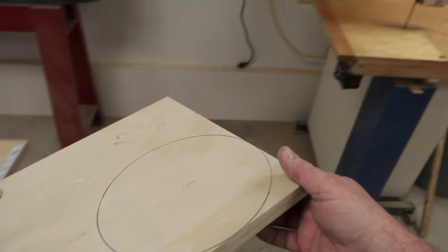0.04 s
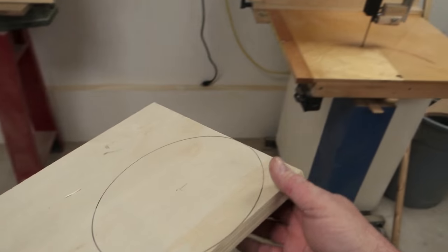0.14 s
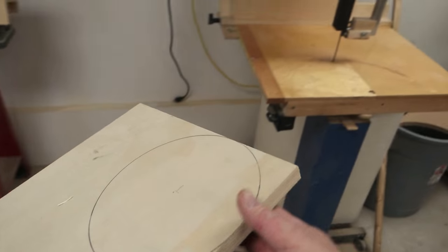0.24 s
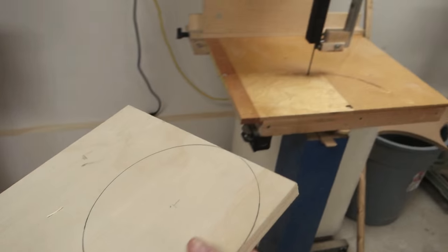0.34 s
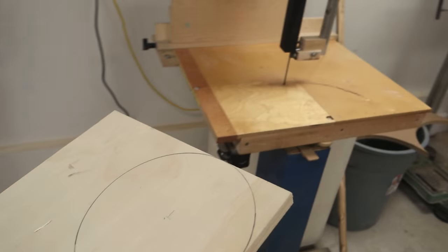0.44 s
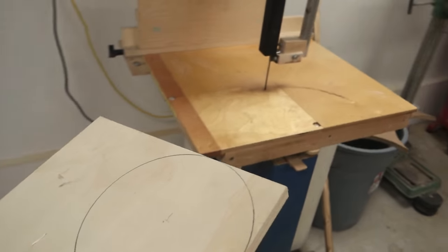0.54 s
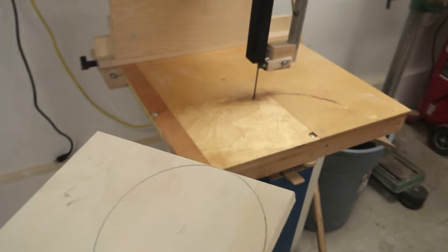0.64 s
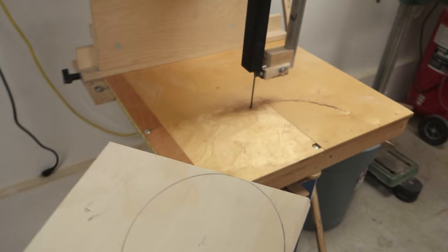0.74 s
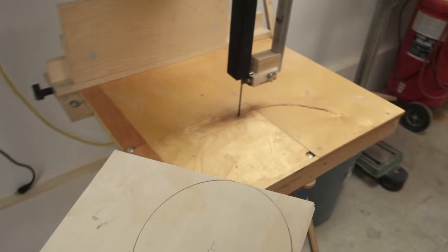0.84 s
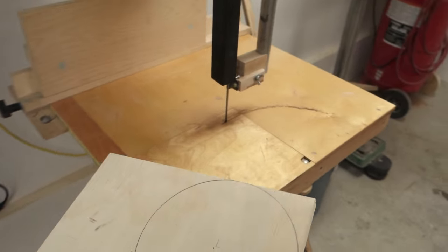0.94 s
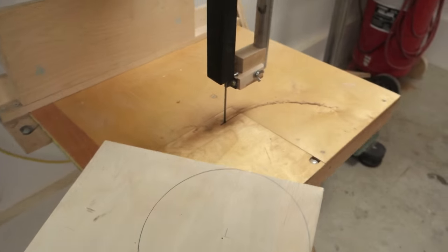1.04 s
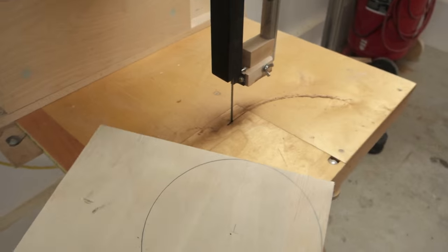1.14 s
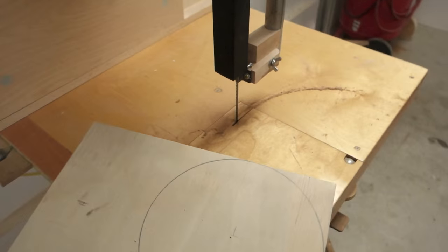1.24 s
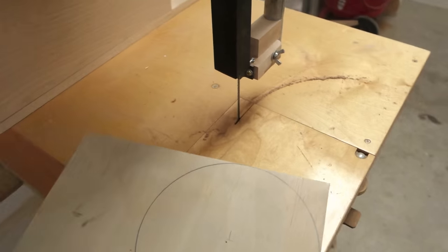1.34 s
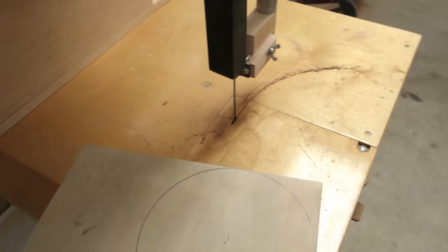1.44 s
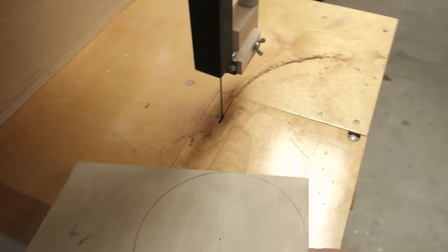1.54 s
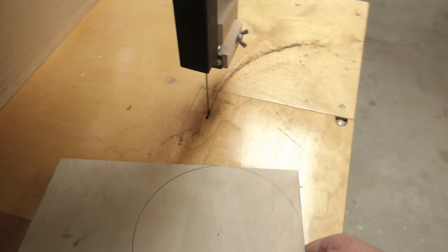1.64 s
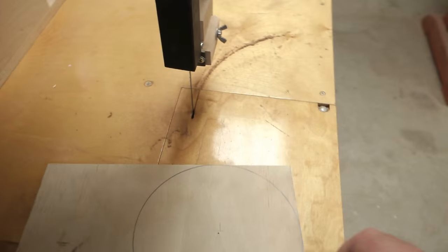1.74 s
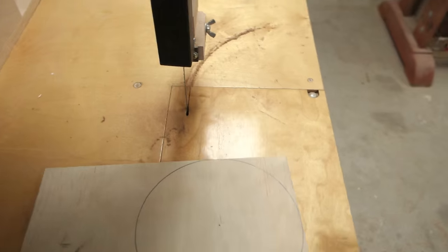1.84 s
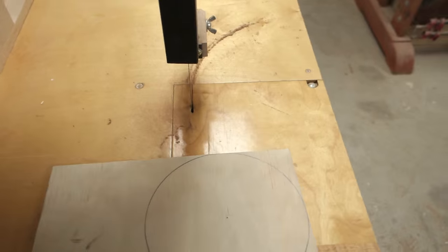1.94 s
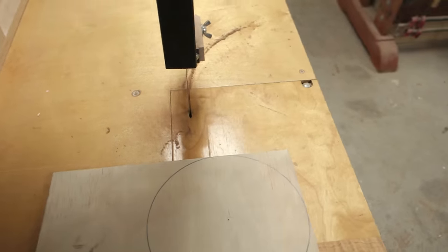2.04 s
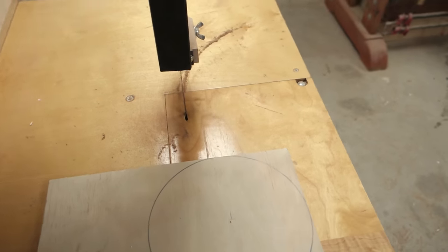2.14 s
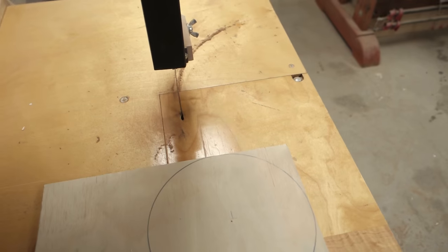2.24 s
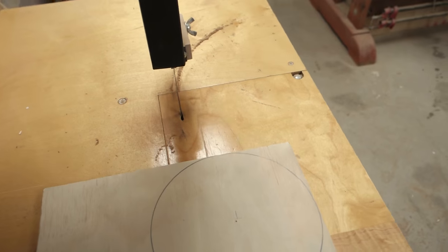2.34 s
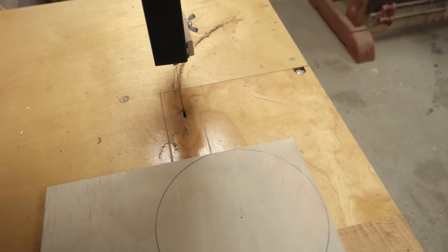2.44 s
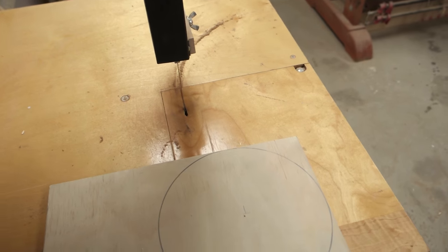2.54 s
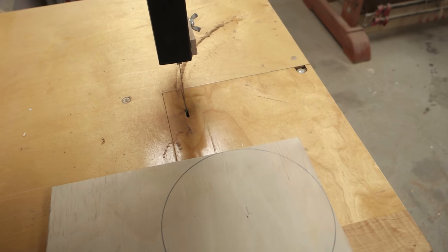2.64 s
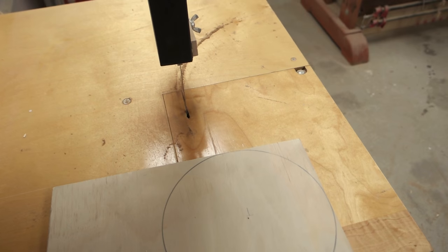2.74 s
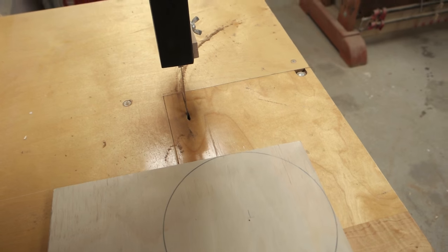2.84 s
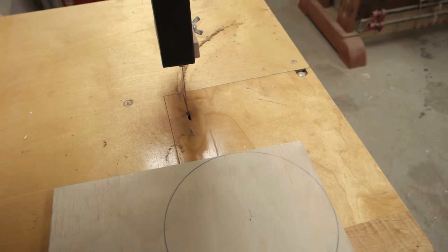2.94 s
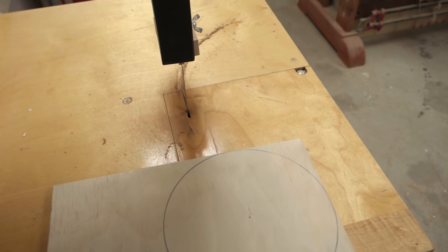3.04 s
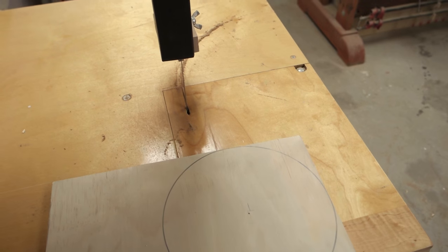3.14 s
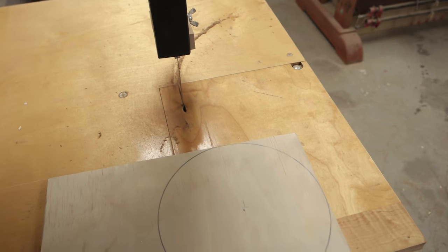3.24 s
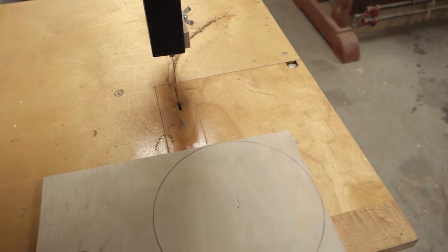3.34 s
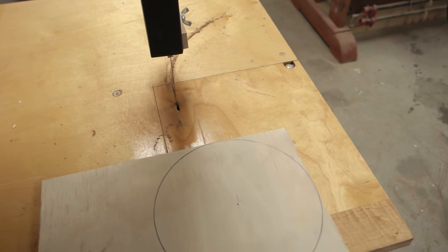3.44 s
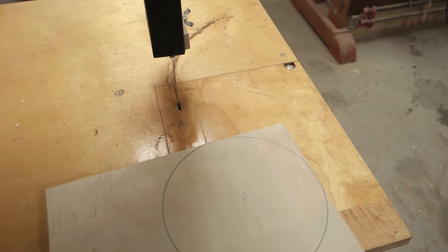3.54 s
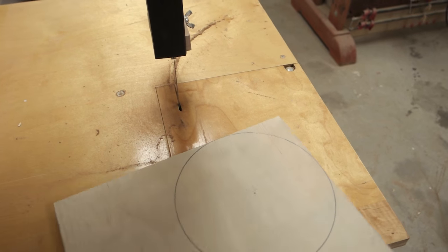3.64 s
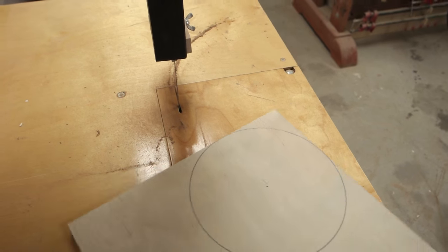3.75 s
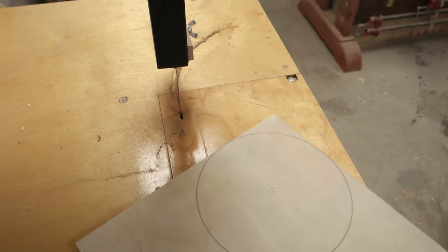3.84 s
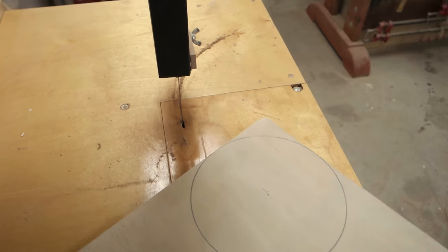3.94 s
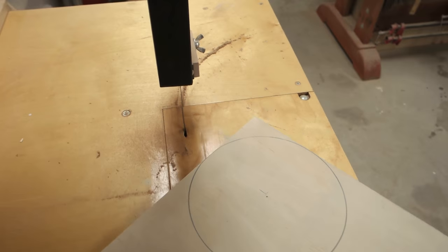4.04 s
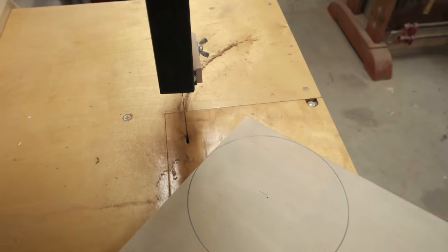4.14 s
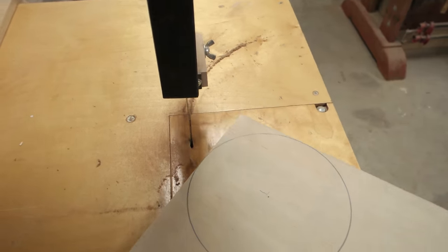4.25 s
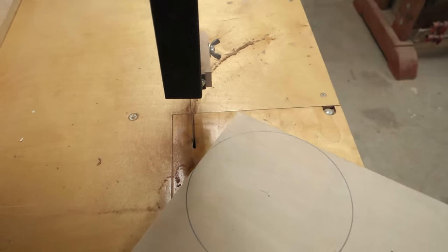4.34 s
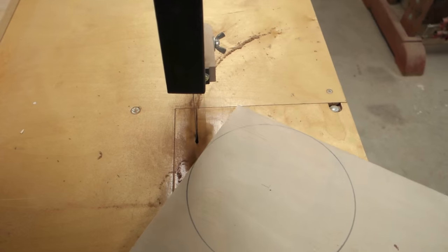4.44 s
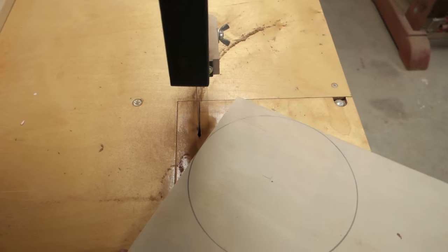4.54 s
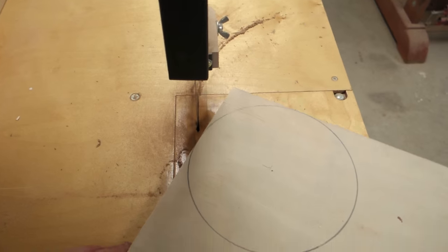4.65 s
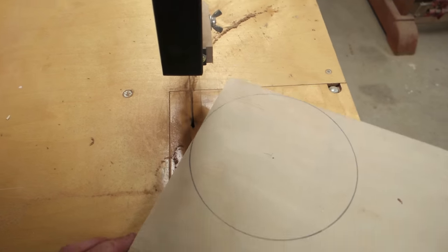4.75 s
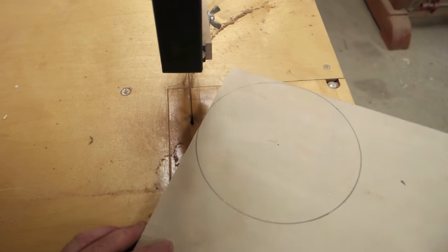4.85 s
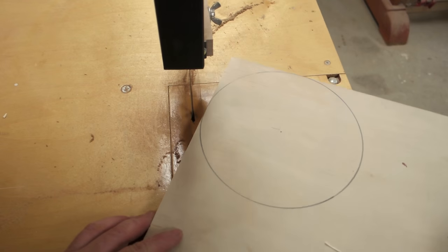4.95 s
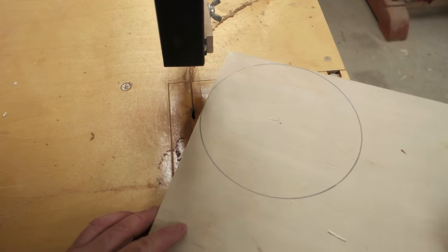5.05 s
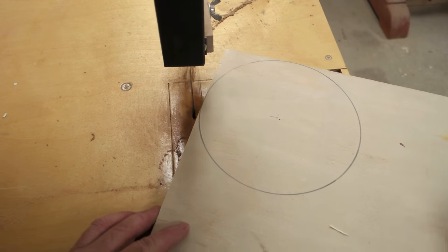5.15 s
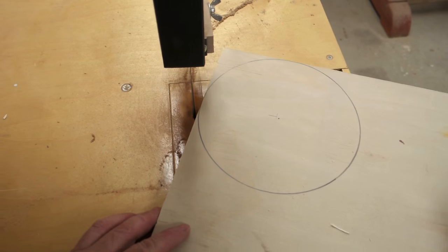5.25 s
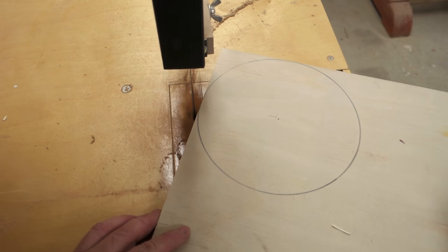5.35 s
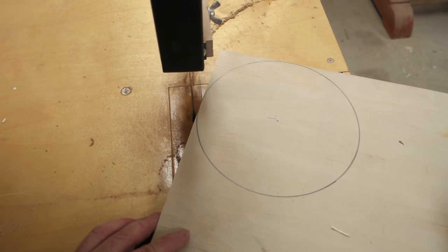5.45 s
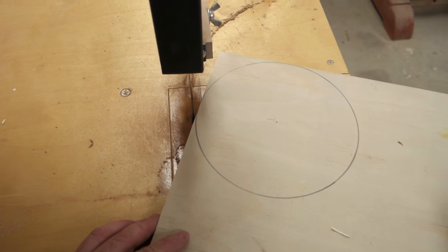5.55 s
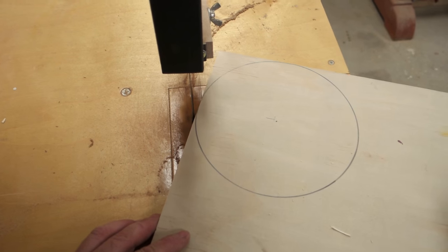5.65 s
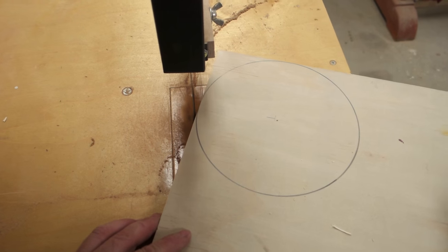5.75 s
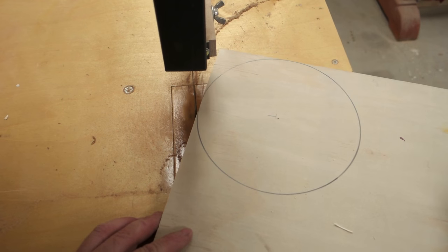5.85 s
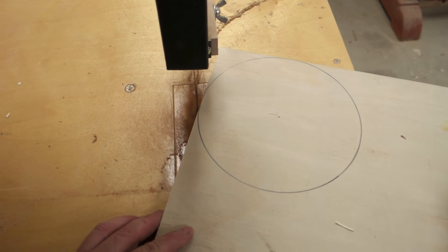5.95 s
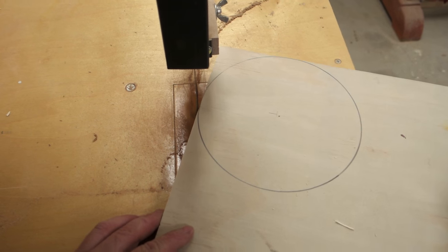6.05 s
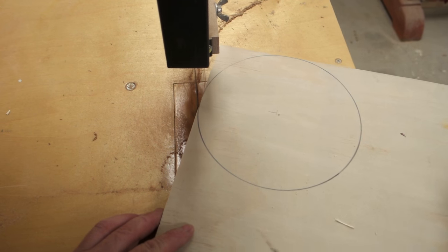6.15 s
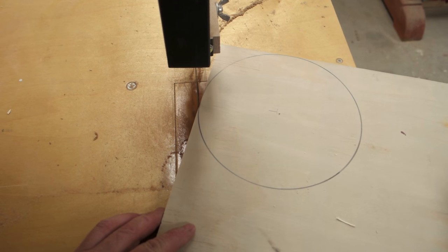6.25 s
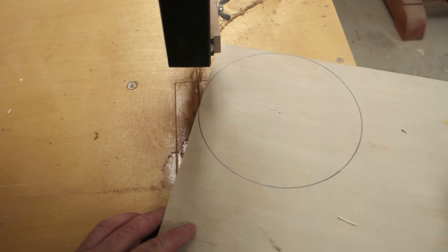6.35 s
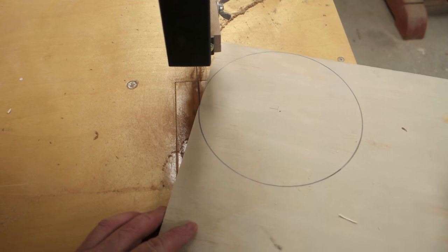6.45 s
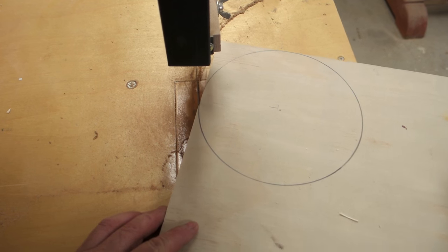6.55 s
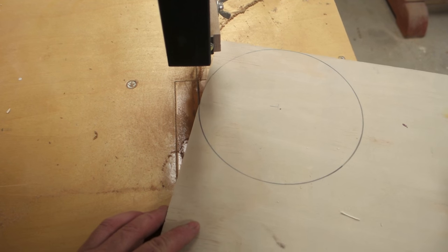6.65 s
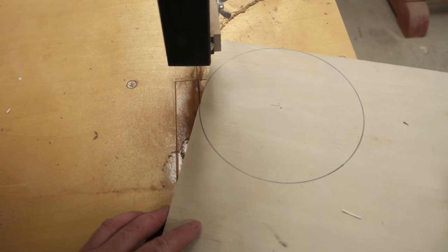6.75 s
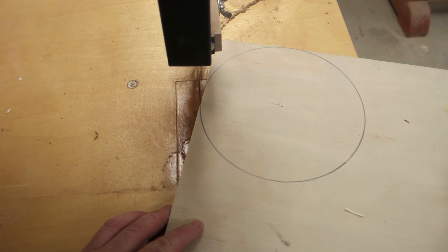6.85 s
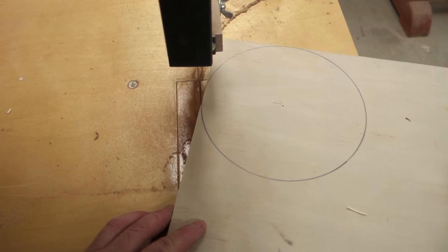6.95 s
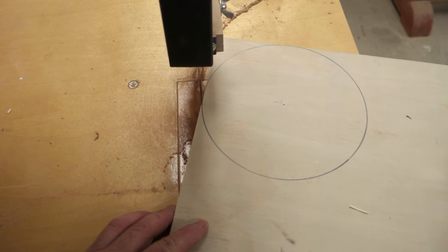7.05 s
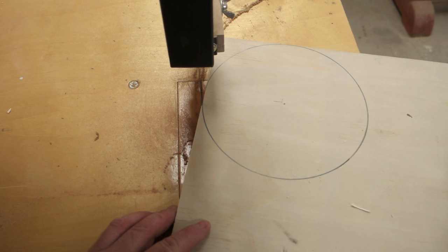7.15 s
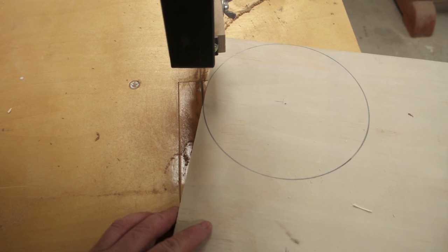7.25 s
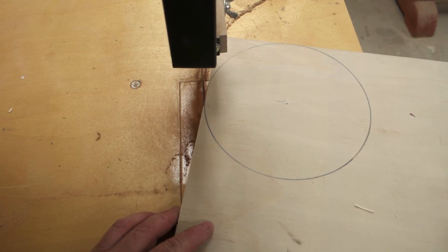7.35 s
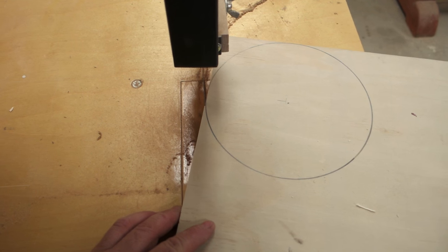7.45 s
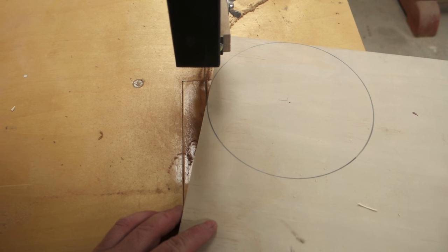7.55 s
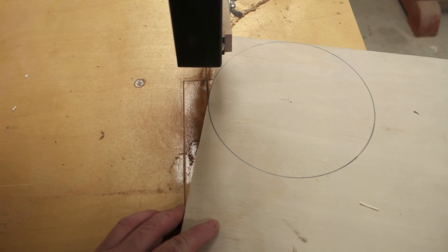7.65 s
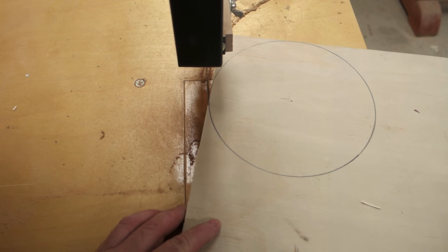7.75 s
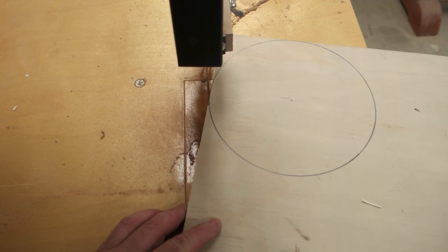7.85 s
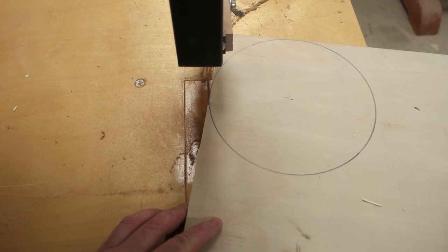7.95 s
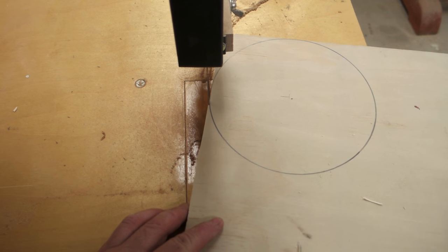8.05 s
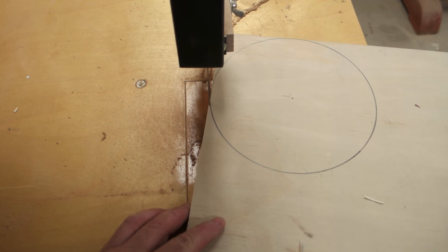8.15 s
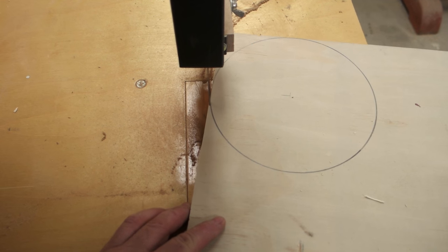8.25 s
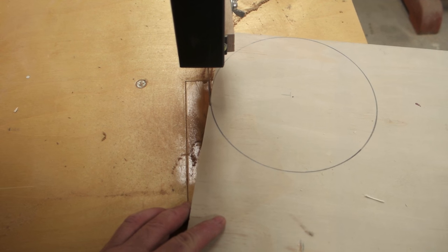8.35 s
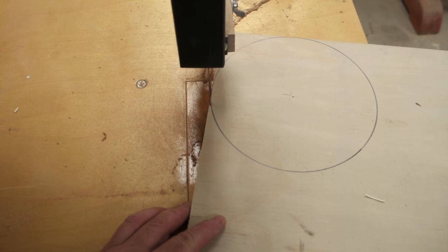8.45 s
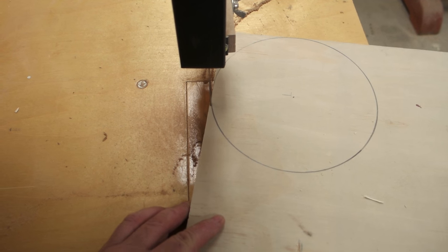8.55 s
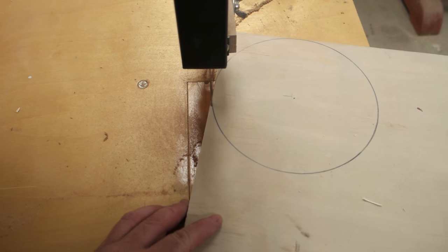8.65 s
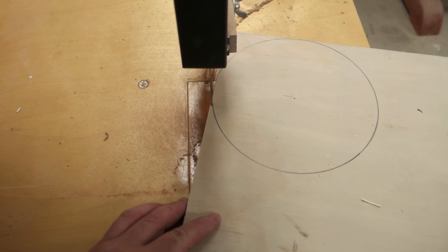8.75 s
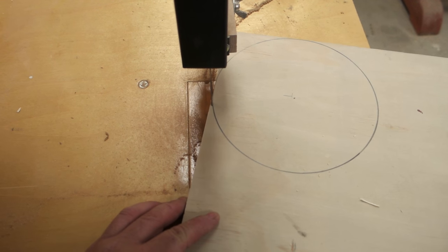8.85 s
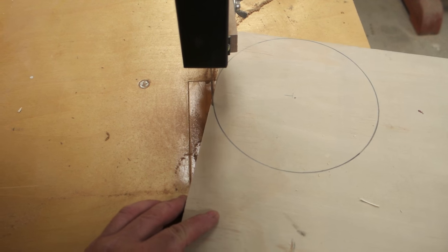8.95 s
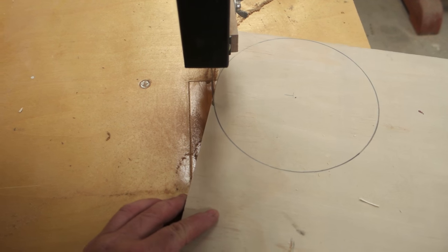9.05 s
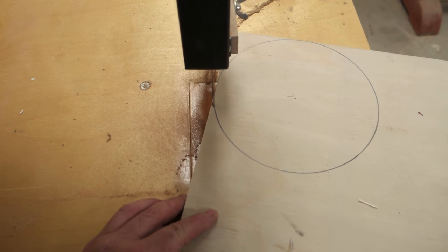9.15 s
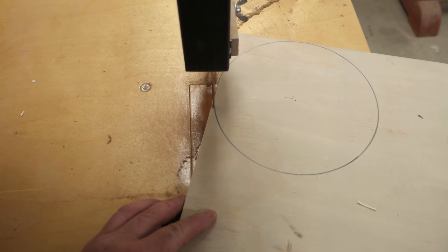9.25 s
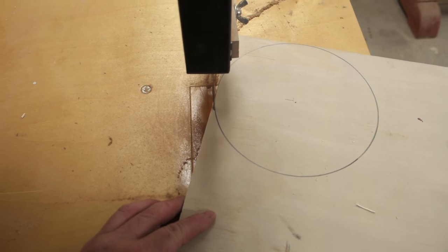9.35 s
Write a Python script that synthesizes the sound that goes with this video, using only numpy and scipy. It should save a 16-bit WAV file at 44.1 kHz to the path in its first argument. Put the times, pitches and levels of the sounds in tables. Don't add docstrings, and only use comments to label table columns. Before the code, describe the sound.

Close, centred camera sound in a small hard workshop. From 0 to 1.5 seconds, quiet cloth rustle, finger rubs and little board scuffs over faint hiss. A stronger wooden rub leads to a dull touch at 1.6, a bright bouncing knock around 1.77 and another double knock at 1.92, with low thumps and short room ring. A slide and bump follow near 2.3, then faint handling. At 3.2 a switch snaps; the motor jerks, the cabinet shudders, and hum and blade hiss climb, with a soft thud around 4.1. It runs steadily, hissing in small rhythmic swells. From 6.4 teeth graze the wood with thin flickering tones. After 7.2 the whine hardens, with woody groans around 7.6 to 7.9. From 7.8 to 9.4 it is loud, shrill and gritty, chips tearing, pitch nearly steady, hiccupping about every quarter second, easing slightly at the end.

```python
import sys
import numpy as np
from scipy import signal
from scipy.fft import rfft, irfft, next_fast_len
from scipy.io import wavfile
from scipy.ndimage import uniform_filter1d, map_coordinates

SR = 44100
rng = np.random.default_rng(int(sys.argv[2]) if len(sys.argv) > 2 else 0)


def bounce(signal):
    frames = np.transpose(np.atleast_2d(signal))
    limited = np.clip(frames, -1, 1)
    pcm = np.round(limited * 32767).astype(np.int16)
    wavfile.write(sys.argv[1], SR, pcm)


def boost_factor(decibels):
    exponent = np.asarray(decibels, float) / 20
    return 10 ** exponent


N = 414099
T = np.arange(N) / SR
SWITCH_S = 3.217
IDLE_FEED_DB = -46.5

# frequency in Hz, density in dB per Hz.
CLOTH_SPECTRUM = [(290, -30), (500, -1), (759, -9), (929, -6), (1200, -4.5), (3160, -4.5), (5950, -5.5),
                  (14500, -30), (15600, -41)]
# frequency in Hz, density in dB per Hz.
STAND_SPECTRUM = [(12, -46), (20, -3), (45, 1), (80, -0.5), (150, -8), (202, -7), (238, -7.5), (341, -8),
                  (481, -16.5), (630, -11), (1500, -23.5), (1950, -59), (3300, -120)]
# frequency in Hz, density in dB per Hz.
MIC_HISS_SPECTRUM = [(880, -31), (1500, -11), (1670, -2), (4370, -26), (5860, -8), (15000, -5),
                     (15600, -13)]
# frequency in Hz, width in Hz, level in dB.
HELD_BOARD_MODES = [(625, 70, 0), (870, 80, -4), (1380, 150, -3), (2280, 220, -3.5), (3400, 400, -10)]
# peak in seconds, level in dB, 20 dB rise in seconds, 20 dB fall in seconds.
STROKES = [(.07, -76, 0.59, 0.44), (.43, -69.5, 0.44, 0.1), (.63, -69.5, 0.16, 0.26),
           (.76, -72, 0.16, 0.028), (1.084, -62, 0.015, 0.12), (1.17, -69, 0.055, 0.31),
           (1.372, -86, .03, .03), (1.55, -72, 0.17, .3), (1.7, -66, 0.077, 0.14),
           (1.81, -74, 0.064, 0.069), (1.92, -58, 0.013, 0.091), (2.0, -63, 0.13, 0.18),
           (2.06, -56, 0.15, 0.13), (2.13, -61, 0.2, 0.31), (2.19, -58, 0.17, 0.047),
           (2.316, -68, 0.031, 0.033), (2.51, -77, 0.027, 0.028), (2.64, -71, 0.14, 0.052),
           (2.81, -75.5, 0.049, 0.16), (2.895, -81, .03, 0.054), (3.08, -76.5, 0.12, 0.23)]
# peak in seconds, level in dB, rise in seconds, fall in seconds.
RUBS = [
    (.16, -68, 0.4, .12),
    (.43, -72, .15, .08),
    (.6, -64, 0.13, 0.3),
    (1.47, -61, 0.059, .1),
    (1.54, -50.5, 0.074, 0.15),
    (1.81, -53, .08, 0.27),
    (1.95, -59, .08, .28),
    (2.64, -77, 0.22, .07),
    (2.82, -71, 0.034, 0.28),
    (3.18, -67, 0.41, 0.19),
]
# peak in seconds, level in dB, rise in seconds, fall in seconds.
JOLTS = [
    (.165, -65, .06, 0.065),
    (.72, -71, 0.24, 0.18),
    (1.2, -77, 0.21, 0.37),
    (1.55, -90, 0.21, .3),
    (1.81, -50, 0.059, .12),
    (1.97, -52, 0.089, 0.21),
    (2.26, -65, .06, 0.089),
    (2.34, -63.5, 0.078, 0.053),
    (2.6, -69.5, 0.15, 0.44),
    (3.2, -64, 0.18, 0.16),
]
# start in seconds, level in dB, pitch in Hz, width in Hz, length in seconds.
SCUFFS = [(0.175, -74, 250, 300, 0.029), (.25, -73, 5700, 400, 0.15), (.27, -76, 4630, 300, .08),
          (0.334, -88, 1500, 200, .06), (.3, -75, 9900, 4000, 0.16), (0.543, -63, 500, 300, 0.012),
          (0.562, -63, 550, 300, 0.012), (0.61, -65, 500, 300, 0.015), (0.4, -70, 1490, 60, 0.05),
          (0.501, -65, 500, 500, 0.019), (1.073, -63, 810, 500, 0.15), (1.155, -54, 1330, 300, 0.03),
          (1.155, -59.5, 2280, 500, 0.041), (1.178, -60, 1700, 1500, 0.028), (1.371, -64, 250, 400, 0.011),
          (1.696, -63, 2480, 150, .02), (1.635, -68, 2470, 120, .08), (2.242, -55, 170, 260, 0.025),
          (2.29, -61.5, 2770, 500, 0.051), (2.297, -65, 1170, 150, 0.046), (2.3, -73, 647, 150, 0.091),
          (2.275, -57, 89.5, 79.5, 0.075)]

# time in seconds, peak in dB, brightness in dB per octave, thump in dB,
# rattle t60 in seconds.
KNOCKS = [
    (1.632, -27.5, -8.5, -36, 0.1),
    (1.763, -18, -1.5, -30, 0.12),
    (1.781, -14, 0.5, -41, 0.051),
    (1.801, -22, -7, -47, 0.042),
    (1.918, -14, -3, -45.5, 0.047),
    (1.934, -18.5, -4, -39.5, 0.071),
]
# time in seconds, peak in dB.
SNAPS = [
    (1.7635, -21),
    (1.783, -19),
    (1.919, -34),
]
# frequency in Hz, width in Hz, level in dB.
BOARD_MODES = [(309, 102, -5), (512, 120, -6), (695, 69, -3), (910, 160, -4.5), (1286, 220, -2),
               (1770, 400, -4.5), (2600, 350, -6), (3760, 670, -15), (5960, 1100, -18.5)]
# frequency in Hz, t60 in seconds.
ROOM_T60 = [(100, 0.55), (300, 0.5), (700, 0.36), (2000, 0.35), (5000, 0.46), (12000, 0.13)]
# time in seconds, level in dB, pitch in Hz, t60 in seconds,
# rise in seconds.
BUMPS = [(1.631, -37.5, 281, 0.31, 0.0038), (1.763, -29.5, 280, 0.24, 0.0036), (1.918, -37, 720, .22, .002),
         (1.918, -38, 834, 0.19, .002), (1.918, -34.5, 1066, 0.18, .002), (1.934, -38, 1190, .2, .002),
         (1.934, -37.5, 968, .22, .002), (1.918, -43, 1510, .15, .002), (1.763, -37.5, 246, 0.1, .003),
         (1.764, -35, 1580, 0.15, .002), (2.245, -39, 109.8, 0.14, .015), (2.255, -43, 272, 0.095, 0.011),
         (2.3, -50, 81, .25, .012), (3.235, -30, 57.9, 1.3, 0.091), (3.235, -36, 68.4, 1.5, 0.083),
         (4.09, -35, 273, 0.39, 0.026), (4.02, -36, 556, 0.22, 0.01)]

# frequency in Hz, level in dB, t60 in seconds.
SWITCH_MODES = [(660, -6, 0.19), (1034, -1.5, 5.0), (1840, -12, 0.085), (2140, -21, 0.13),
                (2100, -22, 0.17), (2410, -27, 0.17), (3520, -7.5, 0.64), (4160, -18, 0.27)]

# time in seconds, speed in turns per second, level in dB.
SHAFT = [
    (3.24, 11, -73),
    (3.6, 30, -45),
    (3.82, 26, -38),
    (4.0, 29.6, -50),
    (4.1, 31.2, -41),
    (5.2, 30, -36.5),
    (6.2, 30.9, -45),
    (9.39, 29.2, -39.5),
]
# multiple of the shaft rate, level in dB.
SHAFT_ORDERS = [(1, -13), (3, -2.5), (5, -10.5), (10, -13)]
# starting level in dB, running level in dB, jerk in dB, dropout in dB,
# gain in dB per dB of feed, slow drift in dB.
HUM_240HZ = (-41, -42.5, -51, -28.5, 0.68, -0.2)
HUM_120HZ = (-71, -43.5, -42, -31, 0.2, 0)
SHAKE = (-56, -48, -47, -52, .1, 2.5)
BELT = (-40, -41.5, -43, -63, 0.1247, 1.15)
# frequency in Hz, width in Hz, level in dB.
CABINET_MODES = [(64, 12, 0)]
# frequency in Hz, width in Hz, level in dB.
PANEL_MODES = [(200.5, 25, -9.5), (280.3, 18.5, -1.5), (304.2, 7.5, 2.5), (368.6, 10.7, 1), (440, 20, -12),
               (479, 25, -11), (544, 12, -10), (709, 25, -12)]
# frequency in Hz, density in dB per Hz.
RUMBLE_SPECTRUM = [(12, -40), (20, -12), (109, -4), (188, -2.5), (238, -9), (341, -5.5), (536, -3.5),
                   (608, -13.5), (702, -11.5), (905, -14.5), (1450, -20.5), (2200, -28.5), (2900, -45),
                   (4000, -120)]

# frequency in Hz, density in dB per Hz.
HISS_SPECTRUM = [(410, -14), (700, 0), (777, -6.5), (1570, -8), (2530, -9), (4150, -17), (5310, -12.5),
                 (7260, -22), (12500, -28), (14600, -35), (15600, -26)]
# frequency in Hz, width in Hz, level in dB.
GUIDE_MODES = [(1012, 15, -3), (1754, 86, -3.5), (2470, 63, 0.5), (3830, 82, -4.5), (4410, 51, -10),
               (5320, 210, -2), (6830, 300, -11.5), (7660, 110, -11.5)]
# frequency in Hz, width in Hz, level in dB.
BEARING_MODES = [(2456, 12, 0), (2518, 14, -4), (3005, 25, -9), (3792, 20, -7), (5415, 18, -3)]
# peak in seconds, level over the running hiss in dB.
BRUSHES = [(3.85, 0), (4.04, 4), (4.281, 0), (4.47, -9), (4.53, 0), (4.76, -1), (4.93, -11), (5.02, -2),
           (5.22, -5), (5.46, -4), (5.58, -10), (5.7, -4.5), (5.93, -5.5), (6.16, -6), (6.41, -8)]

# time in seconds, feed force as tearing level in dB, chatter of the buried blade in dB.
FEED = [(6.3, -72, -72), (6.47, -46.5, -50), (6.6, -52, -45.5), (6.95, -48, -45), (7.25, -44.5, -33.5),
        (7.55, -43, -31.5), (7.8, -41, -23), (8.15, -40, -22.5), (8.65, -41.5, -23.5), (8.8, -40, -25.5),
        (9.19, -39.5, -27.5), (9.39, -41, -32.5)]
# time in seconds, teeth per second.
TOOTH_RATE = [
    (6.3, 818.8),
    (7.2, 818.6),
    (7.5, 817.4),
    (8.4, 816.8),
    (9.39, 816.2),
]
WELDS = [6.145, 6.38, 6.615, 6.85, 7.085, 7.321, 7.556, 7.791, 8.026, 8.262, 8.497, 8.735, 8.972, 9.204,
         9.44]
# time in seconds, step in dB.
KICKS = [(6.855, 6.5), (7.09, 4), (7.326, 3), (7.561, 6.5), (7.796, 0.5), (7.85, -7), (8.031, 0.5),
         (8.267, 1.5), (8.502, -0.5), (8.737, -6), (8.972, -8), (9.207, -1)]
# multiple of the tooth rate, level in dB.
SCREAM_ORDERS = [(5, 0)]
OVERTONE_ORDERS = [(10, -8.5), (15, -6.5), (13, -15), (17, -19), (18, -19)]
GRAZE_ORDERS = [(7, 0.5), (4, -15), (8, -6), (12, -32), (14, -22), (6, -9), (18, -27)]
BITE_ORDERS = [(3, .5), (2, -5)]
DEEP_ORDERS = [(6, -1)]
# peak in seconds, level in dB, climb in seconds, fade in
# seconds, # settled level in dB, first touch in dB.
GRAZE_ENTRY = (7.3, -39, 1.1, 1.1, -52, -45)
BITE_ENTRY = (7.13, -43, .45, .15, -50.5, -54)
SIXTEENTH_ENTRY = (7.35, -59, 1.2, 1.8, -68, -72)

# frequency in Hz, density in dB per Hz.
CHIP_SPECTRUM = [(1500, -39), (2500, -13.5), (3500, -15.5), (3900, -9.5), (4400, -12.5), (4850, -10.5),
                 (5500, -7.5), (6800, -17.5), (9000, -22.5), (11700, -26), (13500, -29.5), (15700, -36)]
# frequency in Hz, density in dB per Hz.
BODY_SPECTRUM = [(350, -52), (600, -27), (800, -18), (1300, -12.5), (2100, -12), (3000, -17), (4500, -33.5)]
# frequency in Hz, level in dB.
SPAN_TONES = [(1003, -10), (1319, -6.5), (1416, -18), (1475, -16), (2606, -14), (3025, -10), (3470, -17),
              (3784, -11), (4296, -10), (4506, -9), (4576, -14), (4716, 1.5), (4786, -3.5), (4856, -9),
              (5136, -12), (5351, -11)]
# peak in seconds, level in dB, rise in seconds, fall in seconds.
GROANS = [
    (7.58, -36, 0.13, .2),
    (7.72, -40, 0.13, 0.27),
    (7.87, -45, 0.13, .15),
    (8.22, -46, .15, 0.28),
    (8.45, -48, 0.12, .1),
]
# frequency in Hz, width in Hz, level in dB.
KERF_MODES = [(1005, 80, 0), (1920, 75, -1.5), (2005, 80, -2)]

# frequency in Hz, threshold relative to local level in dB.
TREBLE_FLOOR = [(7000, -20), (9500, -12), (12000, -8.5), (13500, -3), (14800, 1.5), (15600, 1)]
# frequency in Hz, difference in dB.
STEREO_RESIDUE = [(60, -45), (180, -46), (550, -36.5), (1650, -35.5), (3000, -32), (4970, -37.5),
                  (9000, -28.5), (15000, -21.5)]


def unit(x):
    return x / np.sqrt(np.mean(x ** 2) + 1e-20)


def level(gain):
    return 20 * np.log10(gain + 1e-9)


def along(points, hz):
    f, v = np.transpose(points)
    return np.interp(np.log(hz + 1), np.log(f + 1), v)


def curves(rows):
    s, *cols = np.transpose(rows)
    return [np.interp(T, s, c) for c in cols]


def after(start_s, rise_s):
    return np.clip((T - start_s) / rise_s, 0, 1)


def swells(rows):
    return sum(boost_factor(db - 20 * np.maximum((s - T) / rise, (T - s) / fall)) for s, db, rise, fall in rows)


def wobble(rate_hz):
    return map_coordinates(rng.standard_normal(int(N * rate_hz / SR) + 4), [T * rate_hz])


def tone(turns, db):
    return np.sqrt(2) * boost_factor(db) * np.sin(2 * np.pi * turns)


def filtered(x, response):
    m = next_fast_len(N + SR // 2)
    return irfft(rfft(x, m) * response(np.fft.rfftfreq(m, 1 / SR)), m)[:N]


def colour(spectrum):
    return lambda hz: boost_factor(along(spectrum, hz))


def resonances(modes):
    def response(f):
        total = 0
        for k, (hz, width, db) in enumerate(modes):
            total = total + (-1) ** k * boost_factor(db) * 1j * f * width / (hz * hz - f * f + 1j * f * width)
        return total
    return response


def friction(modes):
    return lambda f: resonances(modes)(f) ** 2


def rush(response, band_hz, grit_db=0, standing_db=5.0):
    knots = rng.standard_normal(1500)
    knots_hz = np.linspace(0, SR / 2, len(knots))

    def rippled(hz):
        return response(hz) * boost_factor(standing_db * np.tanh(np.interp(hz, knots_hz, knots)))

    x = filtered(rng.standard_normal(N) * boost_factor(grit_db * wobble(900)), rippled)
    return x / np.std(filtered(x, lambda hz: (hz > band_hz[0]) & (hz < band_hz[1])))


def handling():
    still_cloth_db, still_rub_db, still_stand_db = -86, -90, -73.5
    cloth = (boost_factor(still_cloth_db) + swells(STROKES)) * boost_factor(1.7 * wobble(30.38))
    cloth *= rush(colour(CLOTH_SPECTRUM), (3000, 9000), grit_db=0.5)
    rub = (boost_factor(still_rub_db) + swells(RUBS)) * boost_factor(1.3 * wobble(25.8) - 7.5)
    rub *= rush(friction(HELD_BOARD_MODES), (500, 2500), grit_db=2.5)
    stand = (boost_factor(still_stand_db) + swells(JOLTS)) * boost_factor(1.3 * wobble(26.95))
    stand *= rush(colour(STAND_SPECTRUM), (30, 300))
    hiss = boost_factor(-90.0) * rush(colour(MIC_HISS_SPECTRUM), (3000, 9000))
    return cloth + rub + stand + hiss


def scuffs():
    out = np.zeros(N)
    for s, db, hz, width_hz, length_s in SCUFFS:
        u = np.clip((T - s) / length_s, 0, None)
        swell = boost_factor(db + 11) * np.sqrt(u) * np.exp(-2.2 * u)
        out += swell * rush(friction([(hz, width_hz, 0)]), (20, 16000), grit_db=4.5)
    return out


def room(x):
    hz, t, z = signal.stft(rng.standard_normal(SR // 2), SR, nperseg=256)
    decay = boost_factor(-60 * t / along(ROOM_T60, hz)[:, None])
    tail = signal.istft(z * decay, SR, nperseg=256)[1]
    return signal.fftconvolve(np.pad(x, (300, 0)), tail / np.linalg.norm(tail))[:N]


def knocks():
    out, t = np.zeros(N), np.arange(SR // 5) / SR
    for s, db, tilt_db, thump_db, t60 in KNOCKS:
        first = round(s * SR)
        push = np.zeros(N)
        push[first:][:len(t)] = boost_factor(-60 * t / max(t60, .01)) * rng.standard_normal(len(t))
        push[first] += 9

        def struck(f):
            softness = (1 + 1j * f / 300) ** ((tilt_db - 3.5) / 6) / (1 + 1j * f / 6500) ** 2
            return resonances(BOARD_MODES)(f) * softness

        ring = filtered(push, struck)
        hit = boost_factor(db - 1.5) * ring / np.abs(ring).max()
        thump = np.sin(2 * np.pi * 65 * t) + 0.39 * np.sin(2 * np.pi * 135 * t)
        hit[first:][:len(t)] += boost_factor(thump_db - 60 * t / 0.22) * thump * (1 - np.exp(-t / 0.0093))
        out += hit + boost_factor(-5) * room(hit)
    for s, db in SNAPS:
        snap = np.pad(-boost_factor(db) * np.hanning(17), (round(s * SR), N))[:N]
        out += snap + boost_factor(-7.5) * room(snap)
    return out


def bumps():
    return sum(tone(hz * (T - s), db - 60 * np.abs(T - s) / t60) * after(s, rise)
               for s, db, hz, t60, rise in BUMPS)


def switch():
    t = np.clip(T - SWITCH_S, 0, None)
    ring = sum(tone(hz * t + 0.32 * wobble(150), db - 60 * t / min(t60, .13)) for hz, db, t60 in SWITCH_MODES)
    clack = boost_factor(-60 * t / 0.13) * rng.standard_normal(N) * (T > SWITCH_S)
    clack = filtered(clack, lambda f: 1 / (1 + 1j * f / 2500) ** 2)
    click = boost_factor(-35) * after(SWITCH_S, 0.0008) * (ring + 3.4 * clack)
    return click + boost_factor(-12.0) * room(click)


def motor_db(start_db, run_db, jerk_db, dropout_db, load, drift_db):
    jerk = (3.32, jerk_db, 0.15, 0.19)
    dropout = (4.14, dropout_db, 0.073, 0.1)
    running = after(4.02, 0.16)
    feed_db = np.clip(curves(FEED)[0] - IDLE_FEED_DB, 0, None)
    steady_db = start_db + running * (run_db - start_db + drift_db * wobble(6.0)) + load * feed_db
    return level(boost_factor(steady_db) + swells([jerk, dropout]))


def motor():
    hum4_db, hum2_db = motor_db(*HUM_240HZ), motor_db(*HUM_120HZ)
    shake_db, rumble_db = motor_db(*SHAKE), motor_db(*BELT)
    speed_hz, shaft_db = curves(SHAFT)
    turns = np.cumsum(speed_hz) / SR

    hum = tone(240 * T, hum4_db - .8 + 1.6 * np.tanh(wobble(20)))
    hum += tone(120 * T, hum2_db - .8 + 0.19 * wobble(15))
    hum += tone(360 * T, hum4_db - 17.5 + 9 * (T < 3.95) + 6.4 * np.tanh(wobble(13)))

    orders = np.zeros(N)
    for k, db in SHAFT_ORDERS:
        order_db = shaft_db + db - 14 * (k == 1) * (T < 4.06)
        order_db = order_db + 1.0 * np.tanh(wobble(6.9)) + 3 * np.tanh(wobble(22))
        orders += tone(k * turns + rng.random(), order_db)

    rock_db = 8.5 * (T < 4) * np.cos(2 * np.pi * 9.8 * (T - 3.335))
    shake = boost_factor(shake_db + 1.5 + rock_db) * rush(friction(CABINET_MODES), (45, 75))

    belt = 0.79 * boost_factor(-4 * (T < 4.04)) * rush(colour(RUMBLE_SPECTRUM), (260, 800))
    panels = 0.67 * rush(resonances(PANEL_MODES), (260, 800), standing_db=4.5)
    rumble = boost_factor(rumble_db + 0.27 * np.sin(2 * np.pi * turns)) * (belt + panels)
    return after(3.23, 0.04) * (hum + orders + shake + rumble)


def hiss_levels():
    run_db, rest_db, spin_up_s, top_db, top_lag_db = -43, -10.5, 0.72, -9.5, -9
    lack = np.exp(-np.clip(T - SWITCH_S, 0, None) / spin_up_s)
    brush_db = 1.12 * level(1 + swells([(s, db, 0.059, 0.091) for s, db in BRUSHES]))
    hiss_db = run_db + rest_db * lack + brush_db
    treble_db = top_db + top_lag_db * (1 - after(3.4, 0.12)) + 2.0 * lack - 0.16 * brush_db
    return hiss_db, treble_db


def blade():
    weld_s, lap_s = 7.561, .2352
    hiss_db, treble_db = hiss_levels()
    hiss = colour(HISS_SPECTRUM)
    scrape = rush(lambda f: hiss(f) * (f < 5500), (1500, 5000), grit_db=1.0)
    ring = boost_factor(0.91 * wobble(9)) * rush(resonances(GUIDE_MODES), (1500, 5000), standing_db=5.0)
    ring += boost_factor(-3.5) * rush(friction(BEARING_MODES), (1500, 6000), standing_db=2)
    treble = rush(lambda f: hiss(f) * (f >= 5500), (6000, 12000), grit_db=1.0)
    weld_db = 2.5 * np.exp(-((T - weld_s) % lap_s) / .03) * after(6.3, .1)
    mix = 0.78 * boost_factor(-2.5 * (1 - after(3.98, 0.034))) * scrape
    mix += 0.4 * after(3.56, 0.39) * ring + boost_factor(treble_db) * treble
    return after(3.23, 0.072) * boost_factor(hiss_db + weld_db) * mix


def chips_and_span():
    tear_db = curves(FEED)[0]
    body_db = 2.5 - 0.28 * (tear_db - IDLE_FEED_DB) + 0.73 * wobble(7.9)
    chips = rush(colour(CHIP_SPECTRUM), (6700, 8000), grit_db=1.3, standing_db=5.5)
    body = boost_factor(body_db) * rush(colour(BODY_SPECTRUM), (1700, 2300), grit_db=1.5)
    noise = boost_factor(tear_db - 1.54 + 0.85 * wobble(25)) * (chips + body)

    span = np.zeros(N)
    for hz, db in SPAN_TONES:
        late_db = -6.5 * (hz > 4600) * (1 - after(7.3, 0.11))
        span += tone(hz * T + 0.12 * wobble(60), db + 2.4 * wobble(25) + 0.93 * wobble(90) + late_db)
    cluster = rush(friction([(4800, 300, 0)]), (4500, 5100), grit_db=8.0)
    span += boost_factor(-2.5) * after(7.3, 0.32) * cluster

    groan = swells(GROANS) * rush(friction(KERF_MODES), (800, 2200), standing_db=-1)
    return groan + after(6.27, 0.37) * noise + after(6.8, 0.46) * boost_factor(flutter_db()) * span


def flutter_db():
    wake_s, wake_db, wake_db_per_s, top_db = 7.5, -41.5, 18, -38.5
    creep_db = wake_db + (top_db - wake_db) * after(wake_s, 1.0)
    return creep_db - np.clip(wake_db_per_s * (wake_s - T), 0, 25)


def chatter_db():
    settle_s = 0.047
    kicks_db = sum(db * (T > s) * np.exp(-np.abs(T - s) / settle_s) for s, db in KICKS)
    return curves(FEED)[1] + kicks_db


def entering_db(peak_s, db, climb_s, fade_s, rest_db, touch_db):
    touch_s = 6.44
    flicker_db = 1.5 * wobble(12)
    entry = swells([(peak_s, db, climb_s, fade_s), (touch_s + 0.1, touch_db, .5, 1.2)])
    return level(after(touch_s, .03) * (entry + boost_factor(rest_db + flicker_db)))


def teeth():
    slip_teeth = .09
    count = np.cumsum(curves(TOOTH_RATE)[0]) / SR + 0.01 * wobble(7.5) + 0.0042 * wobble(90)
    laps = np.clip(np.searchsorted(WELDS, T), 1, len(WELDS) - 1)
    since_s = np.abs(T - np.take(WELDS, laps - 1))
    until_s = np.take(WELDS, laps) - T
    off_s = np.where(since_s < until_s, since_s, -until_s)
    rebound_db = 1.5 * np.exp(-since_s / .02) - 14 * np.exp(-((off_s - .0015) / .003) ** 2)
    grazing_db = 1.1 * (1 - after(7.0, .5))
    lead_turns = .14 * np.exp(-since_s / .009)

    scream_db = chatter_db() + 2 * np.cos(2 * np.pi * 30 * T) * (1 - after(6.95, .12))
    over_db = -42.5 + 0.45 * (scream_db + 28.0) + 4 * np.tanh(wobble(12)) + 2.5 * wobble(45)
    over_db -= 6 * (1 - after(7.7, 0.28))
    groups = [(SCREAM_ORDERS, scream_db), (OVERTONE_ORDERS, over_db),
              (GRAZE_ORDERS, entering_db(*GRAZE_ENTRY)), (BITE_ORDERS, entering_db(*BITE_ENTRY)),
              ([(16, 0)], entering_db(*SIXTEENTH_ENTRY)),
              (DEEP_ORDERS, flutter_db() - 7 * (1 - after(8.6, .1)))]

    out = np.zeros(N)
    for orders, base_db in groups:
        group_db = base_db + rebound_db + grazing_db * 2 * np.tanh(wobble(60))
        for k, db in orders:
            slip = 2 * np.pi * k * slip_teeth * laps
            re, im = uniform_filter1d([np.cos(slip), np.sin(slip)], size=24)
            angle = 2 * np.pi * (k * count + lead_turns + rng.random())
            size = boost_factor(group_db + db + .12 * k * wobble(50) + 0.9 * wobble(300))
            out += np.sqrt(2) * size * (re * np.sin(angle) - im * np.cos(angle))

    yelp_db, yelp_s, yelp_hz_per_s = -5, .0045, 60000
    yelp = tone(5 * count + yelp_hz_per_s / 2 * off_s ** 2, scream_db + yelp_db)
    yelp *= np.exp(-(off_s / yelp_s) ** 2 / 2)
    return after(6.35, 0.045) * (out + yelp)


def scene():
    board = handling() + scuffs() + knocks() + bumps()
    saw = switch() + motor() + blade() + chips_and_span() + teeth()
    mono = board + saw
    return np.array([mono, mono])


def smooth(x, bins, frames):
    return uniform_filter1d(uniform_filter1d(x, size=bins, axis=0), size=frames, axis=1)


def band_limit(x):
    return signal.sosfilt(signal.butter(12, 15770, fs=SR, output="sos"), x)


def record(dry):
    hz, t, z = signal.stft(dry[0], SR, nperseg=2048)
    size = smooth(np.abs(z), 4, 2)
    patches_db = 3 * unit(smooth(rng.standard_normal(z.shape), 16, 2))
    size *= boost_factor(patches_db + 1.5 * rng.standard_normal(z.shape[1]))
    local = np.sqrt(np.abs(uniform_filter1d(np.abs(z) ** 2, size=40, axis=0)))
    busy = (t > 3.25) & (t < 3.95) | (t > 7.45) & (t < 7.7)
    raised_db = 2.5 * np.outer(hz < 11500, t > 7.8) + 4 * np.outer(hz > 13500, busy)
    mid = z * (size > local * boost_factor(along(TREBLE_FLOOR, hz)[:, None] + raised_db))

    uneven_db = 7.0 * unit(uniform_filter1d(rng.standard_normal(z.shape), size=30, axis=0))
    random_phase = np.exp(2j * np.pi * rng.random(z.shape))
    side = mid * boost_factor(along(STEREO_RESIDUE, hz) - 2)[:, None] * boost_factor(uneven_db) * random_phase
    pair = signal.istft(np.array([mid + side, mid - side]), SR, nperseg=2048)[1][:, :N]
    return band_limit(pair + tone(15735 * T, -94))


dry = scene()
out = record(dry)
bounce(out)
```